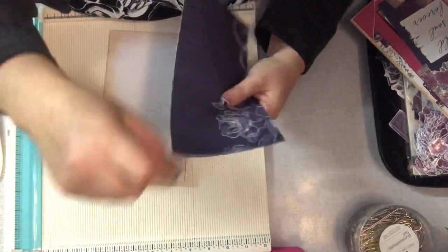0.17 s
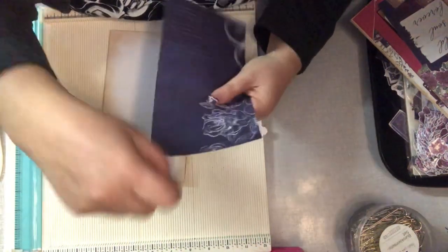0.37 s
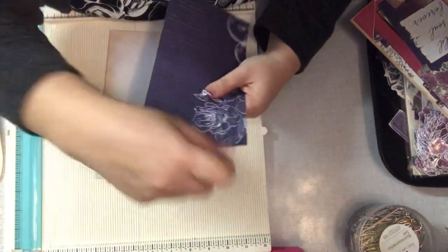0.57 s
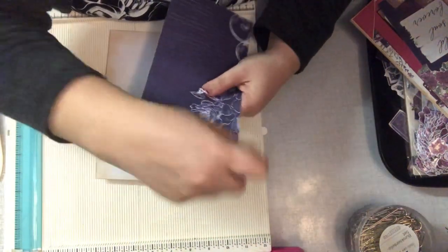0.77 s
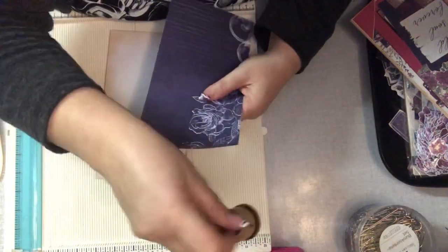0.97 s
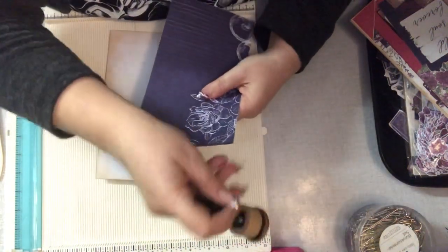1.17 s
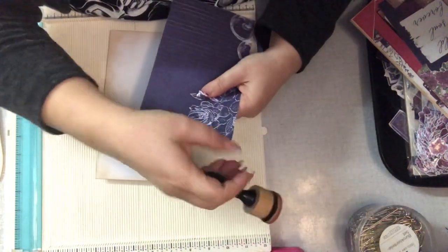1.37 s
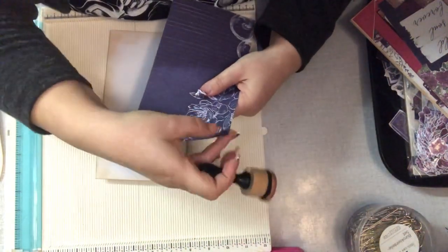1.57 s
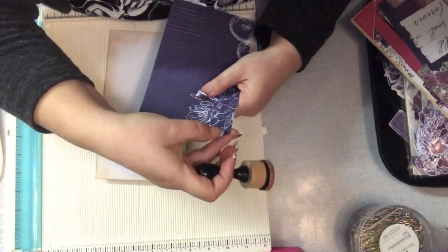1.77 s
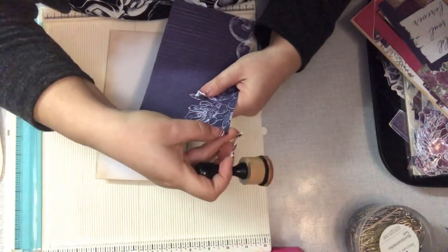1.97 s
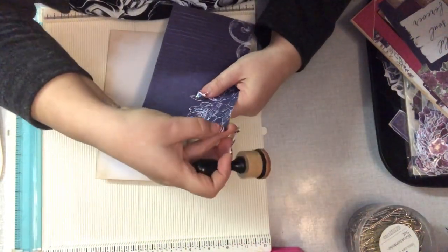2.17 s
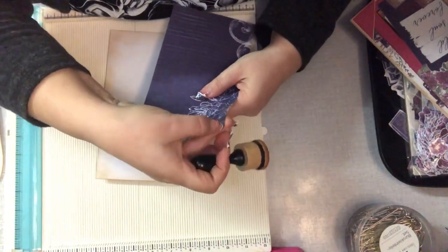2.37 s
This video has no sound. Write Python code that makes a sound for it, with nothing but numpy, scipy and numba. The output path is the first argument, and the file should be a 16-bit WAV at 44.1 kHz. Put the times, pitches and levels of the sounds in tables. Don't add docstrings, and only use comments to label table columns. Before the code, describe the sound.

Close-miked card craft: short hissing foam swipes with papery wobbles, one bright snap and a dull knock, then a lull with small clicks, and quiet rubbing and creasing of card over low motor hum.

```python
import sys
import numpy as np
from scipy import signal
from scipy.fft import rfft, irfft
from scipy.io import wavfile
from scipy.ndimage import uniform_filter1d
from numba import njit

SR = 44100
rng = np.random.default_rng(int(sys.argv[2]) if len(sys.argv) > 2 else 0)


def file_out(sig):
    cols = np.atleast_2d(sig).T
    lim = np.clip(cols, -1, 1)
    pcm = np.round(lim * 32767).astype(np.int16)
    wavfile.write(sys.argv[1], SR, pcm)


def gain_from_db(level_db):
    decades = np.asarray(level_db, float) / 20
    return 10 ** decades


N = 110250
T = np.arange(N) / SR
LONGEST_S = 0.4

# frequency_hz, density_db (per Hz)
FOAM_SPECTRUM = [(180, -32.5), (300, -4), (689, -10.5), (1210, 0), (1660, -13.5), (1870, -3.5),
                 (3190, -7.5), (6960, -18), (16000, -37.5)]


def unit(x):
    return x / np.sqrt(np.mean(x ** 2))


@njit
def svf(x, hz, k):
    y, b, l = np.empty(len(x)), 0., 0.
    for i in range(len(x)):
        g = np.tan(np.pi * hz[i] / SR)
        v = (b + g * (x[i] - l)) / (1 + g * (g + k))
        b, l, y[i] = 2 * v - b, l + 2 * g * v, k * v
    return y


def band(x, hz, width_hz):
    return svf(x, np.full(len(x), 1. * min(hz, .45 * SR)), width_hz / hz)


def body(x, peaks):
    total = 0
    for k, (hz, width_hz, db) in enumerate(peaks):
        total = total + (-1) ** k * gain_from_db(db) * band(x, hz, width_hz) / np.sqrt(width_hz)
    return unit(total)


def colour(x, points, tilt_db=0):
    octave = np.log2(np.maximum(np.fft.rfftfreq(len(x), 1 / SR), 1))
    hz, db = np.array(points).T
    knots = np.log2(hz)
    gain = gain_from_db(np.interp(octave, knots, db) + tilt_db * (octave - 11)) * (octave > knots[0])
    return unit(irfft(rfft(x) * gain, len(x)))


def grit(per_s, spread_db):
    chance, side, size = rng.random((3, N))
    return (chance < per_s / SR) * np.sign(side - .5) * gain_from_db(-spread_db * np.log(np.maximum(size, .02)))


def walk(rate_hz):
    k = int(SR / rate_hz)
    w = uniform_filter1d(np.repeat(rng.standard_normal(N // k + 1), k), k)[:N]
    return w / w.std()


def fade(t0, t60, rise_s, t=T):
    t = np.maximum(t - t0, 0)
    return (1 - np.exp(-t / rise_s)) * gain_from_db(-60 * t / t60)


def ring(modes, rise_s):
    t = T[:int(LONGEST_S * SR)]
    total = sum(gain_from_db(db - 60 * t / t60) * np.sin(2 * np.pi * hz * t) for hz, db, t60 in modes)
    return total * (1 - np.exp(-t / rise_s)) ** 2


def add(out, t0, sound):
    i = int(t0 * SR)
    out[i:i + len(sound)] += sound[:N - i]


def wavering_tone(hz, db):
    return np.sqrt(2) * gain_from_db(db) * np.sin(2 * np.pi * np.cumsum(hz) / SR)


def room_tone():
    # time_s, tone_hz, tone_db, rumble_db
    hum = np.array([(0.0, 117.4, -63.5, -53.5), (0.59, 123.6, -66.5, -55), (0.66, 116.7, -69, -51.5),
                    (0.83, 114.4, -78, -52), (0.88, 124.4, -71, -50), (1.09, 119.7, -65, -58.5),
                    (1.54, 117.7, -56, -55), (1.69, 116.3, -56.5, -53.5), (1.8, 118.8, -67, -56),
                    (2.16, 106.7, -62.5, -55), (2.23, 107.9, -80, -63), (2.46, 104.3, -58, -52.5),
                    (2.5, 105.4, -65, -59)])
    # frequency_hz, density_db (per Hz)
    air_spectrum = [(82, -34.5), (140, -8), (217, -15.5), (469, -17), (498, -23.5), (1220, -26),
                    (1420, -26.5), (5590, -36), (13000, -43), (16000, -56.5)]
    waver_db = 0.5
    tone_hz, tone_db, rumble_db = (np.interp(T, hum[:, 0], column) for column in hum.T[1:])
    tone = wavering_tone(tone_hz * (1 + .02 * walk(6.7)), tone_db + waver_db * walk(25))
    rumble = wavering_tone(49.5 + 2 * walk(12), rumble_db + waver_db * walk(11))
    rumble += wavering_tone(59.7 + 2 * walk(6.1), rumble_db - 6 + waver_db * walk(10))
    w = rng.standard_normal((3, N))
    under = gain_from_db(-66) * unit(band(band(w[1], 78, 53), 78, 53)) + gain_from_db(-65.5) * unit(band(w[0], 30, 60))
    air = colour(w[2], air_spectrum)
    air += gain_from_db(-18) * unit(band(w[1], 5700, 400)) + gain_from_db(-13.5) * unit(band(w[0], 450, 90))
    return tone + rumble + under + gain_from_db(-66.5 + 0.61 * walk(2.8)) * air


def fingers():
    # start_s, length_s, body_db, skin_db
    rub_events = [(0.167, .02, -72.5, -68), (0.559, 0.0286, -72.5, -72), (0.764, 0.046, -68, -80.5),
                  (1.361, 0.059, -75, -79.5), (1.534, 0.039, -64.5, -75), (1.592, 0.053, -64, -71.5),
                  (1.661, 0.044, -64.5, -67), (1.714, 0.021, -55.5, -69), (1.754, 0.014, -64, -67),
                  (1.772, .04, -55.5, -63.5), (1.818, 0.039, -64, -64.5), (1.858, 0.0295, -59, -65.5),
                  (1.909, 0.0084, -61.5, -74.5), (1.956, 0.12, -65, -66.5), (2.055, 0.012, -55.5, -62.5),
                  (2.075, 0.011, -60, -75.5), (2.117, 0.013, -60.5, -70), (2.133, 0.019, -54, -63),
                  (2.155, 0.059, -56, -62.5), (2.213, 0.058, -62.5, -66.5), (2.28, 0.015, -59.5, -73),
                  (2.301, 0.06, -65, -73.5), (2.353, 0.037, -62.5, -60.5), (2.388, 0.053, -63.5, -68.5),
                  (2.44, 0.056, -68, -76)]
    # frequency_hz, width_hz, level_db
    card_modes = [(457, 146, -2), (780, 54, -6.5), (1120, 140, 2), (1297.6, 180, 0), (1520, 250, 0.5),
                  (2200, 415, -14.5)]
    skin_modes = [(2360, 210, -1), (3540, 490, 0.5), (5120, 1800, -3), (7360, 3500, -11),
                  (11275, 3000, -17)]
    rise_s, stop_s = 0.003, 0.0031
    low, high = body(grit(5000, 1.5), card_modes), body(grit(5000, 3.2), skin_modes)
    out = np.zeros(N)
    for t0, dur, low_db, high_db in rub_events:
        s = slice(int(t0 * SR), int((t0 + LONGEST_S / 2) * SR))
        t = T[s] - t0
        rub = np.clip(t / rise_s, 0, 1) * np.exp(-np.maximum(t - dur, 0) / stop_s)
        out[s] += rub * (gain_from_db(low_db) * low[s] + gain_from_db(high_db) * high[s])
    return out * gain_from_db(1.3 * walk(110))


def creases():
    # time_s, peak_db, pitch_hz, t60_s
    low_folds = [(0.032, -40, 1053, 0.024), (0.041, -43.5, 1073, 0.027), (0.384, -39, 1094, 0.024),
                 (0.411, -44, 1076, 0.026), (0.424, -37.5, 1040, 0.027), (0.431, -40, 840, 0.02),
                 (1.666, -48.5, 1100, 0.024), (1.714, -46.5, 1240, 0.022), (1.721, -48, 1020, 0.029),
                 (1.731, -54, 1590, 0.024), (1.773, -40, 1290, 0.02), (1.78, -46.5, 1050, 0.024),
                 (1.792, -48, 1240, 0.024), (1.798, -48.5, 1050, 0.024), (1.81, -47.5, 1580, 0.021),
                 (1.841, -49.5, 1030, 0.024), (1.86, -44.5, 1085, 0.019), (1.867, -45.5, 1070, 0.026),
                 (1.915, -46, 1096, 0.03), (2.059, -43, 1350, 0.024), (2.064, -49, 1100, 0.024),
                 (2.076, -54, 1370, 0.024), (2.119, -41.5, 1250, 0.024), (2.126, -41, 1230, 0.023),
                 (2.161, -49, 1060, 0.024), (2.185, -47, 1180, 0.026), (2.285, -51, 1013, 0.024),
                 (2.36, -51, 1210, 0.024), (2.376, -47.5, 1195, 0.028)]
    crackles = [(0.0114, -34, 2330, 0.014), (0.0248, -34, 3200, 0.013), (0.0328, -32, 3270, 0.011),
                (0.382, -40, 1950, 0.013), (0.4026, -35, 1900, 0.018), (0.4184, -36.5, 3100, 0.015),
                (0.4254, -32, 2150, 0.016), (0.6234, -35, 1840, 0.014), (1.8384, -51, 3550, 0.013),
                (2.2075, -42.5, 3680, 0.013), (2.2847, -48, 2410, 0.014), (2.3018, -50, 2650, 0.012),
                (2.3536, -49, 3530, 0.011), (2.3754, -49.5, 2720, 0.012)]
    buckles = [(0.428, -42.5, 301, 0.03), (0.44, -43.5, 315.7, 0.028), (0.45, -46, 496, 0.038),
               (0.644, -40.5, 326, 0.024), (0.651, -44.5, 483, 0.032), (0.672, -43.5, 493, 0.039),
               (2.06, -46.5, 541, 0.027)]
    # time_s, level_db
    lone_clicks = [
        (1.3, -35.5),
        (1.1484, -40),
        (1.2197, -47),
    ]
    out = np.zeros(N)
    click = ring([(6500, 0, 0.0012)], 1 / SR)
    for t0, db, hz, t60 in [*low_folds, *crackles, *buckles]:
        pop = ring([(hz, 0, t60), (hz * 1.17, -5, t60)], 0.0009)
        add(out, t0, gain_from_db(db + 3) * (pop + gain_from_db(-9) * click))
    for t0, db in lone_clicks:
        add(out, t0, gain_from_db(db) * click)
    return out


def knocks():
    knock_s = [.8382, .5955, .855]
    knock_db = [-30.5, -47, -41]
    thump_db = [-35.5, -35, -71]
    # frequency_hz, level_db, t60_s
    table_modes = [(335.4, 0.5, 0.041), (530.5, 6.5, 0.028), (764, -6.5, 0.058), (1028, -2.5, 0.043),
                   (1470, 8, 0.021), (1560, -25, 0.03)]
    out = np.zeros(N)
    for t0, table_level, thump_level in zip(knock_s, knock_db, thump_db):
        thump = ring([(247, thump_level, 0.027)], 0.0011)
        add(out, t0, gain_from_db(table_level) * ring(table_modes, 0.00096) + thump)
    return out


def ticks():
    # time_s, peak_db, pitch_hz, t60_s
    tick_events = [(0.0327, -27.5, 4530, 0.0085), (0.426, -39, 5600, 0.03), (1.148, -50, 9500, .02),
                   (2.1187, -46.5, 6000, .03), (2.165, -59, 11000, 0.083), (.596, -42.5, 3023, 0.026),
                   (1.148, -47, 3580, 0.052), (1.1672, -48, 4500, 0.03), (1.2017, -49, 4110, 0.0715),
                   (1.217, -42.5, 3617, 0.029), (1.665, -50, 4480, 0.027), (1.772, -44.5, 7000, 0.02),
                   (1.838, -53, 7200, 0.055), (2.059, -51, 4500, .03), (2.207, -40, 3340, 0.02),
                   (2.286, -47.5, 2880, 0.041), (2.302, -49, 3200, 0.018), (.798, -42, 2000, 0.014),
                   (0.3826, -40, 3600, .03), (1.2187, -40, 5600, 0.047)]
    out = np.zeros(N)
    n = int(LONGEST_S * SR / 2)
    g = grit(9000, 3.5)
    air = gain_from_db(-10.5) * colour(g, FOAM_SPECTRUM, 3.0)
    for t0, db, hz, t60 in tick_events:
        i = int(t0 * SR)
        tick = unit(band(g[i:i + n], hz, hz * 0.17)) + air[i:i + n]
        add(out, t0, gain_from_db(db - 9.5) * tick * fade(0, t60, 0.00026, T[:n])[:N - i])
    return out


def rim_snap(snap_s):
    # frequency_hz, density_db (per Hz)
    rattle_spectrum = [(180, -47), (300, -10.5), (978, -8), (2000, -12), (2250, 0.5), (3580, -6),
                       (4090, -2.5), (10900, -30), (16000, -62)]
    # frequency_hz, level_db, t60_s
    rim_modes = [(477, -16, 0.077), (1034, -9.5, 0.066), (1785, -14, 0.1), (2330, -1, 0.033),
                 (2590, -9, 0.04), (2829, -5, .025), (2894, -1.5, 0.025), (3560, -7.5, 0.02),
                 (3730, -5.5, 0.026), (4086, -5.5, .022), (4210, -3.5, 0.018), (4813, -2, 0.028)]
    crack_modes = [(2544, 2.5, 0.0043), (4414, 6, 0.0029), (7600, -12, 0.0034)]
    out = gain_from_db(-13.5) * colour(rng.standard_normal(N), rattle_spectrum) * fade(snap_s, 0.042, 0.0013)
    add(out, snap_s, gain_from_db(-16) * ring(rim_modes, 0.0003) + ring(crack_modes, 0.00031))
    return out


def swipes():
    # start_s, length_s, hiss_db, brightness_db (per octave), wobble_db
    swipe_events = [
        (.003, 0.036, -45, 2.5, -48),
        (0.184, 0.043, -45.5, 3.5, -33.5),
        (0.372, 0.055, -46, 1, -41.5),
        (0.599, 0.035, -42.5, -1.16, -39),
        (0.802, 0.04, -45, 0, -34.5),
        (0.844, 0.019, -50.5, 1.7, -56.5),
        (0.892, 0.04, -57.5, -2, -54.5),
    ]
    # frequency_hz, width_hz, level_db
    edge_modes = [(1200, 52, -11), (2016, 45, 2.5), (2260, 27, -9), (2580, 40, -4), (3200, 49, -3)]
    rise_s, stop_s = 0.0083, 0.0041
    wobble_from_hz, wobble_to_hz, sag_s, wobble_width = 1100, 328, 0.011, 1.2
    flap_hz, flap_width_hz = 262, 200
    g, shake, out = grit(8000, 3.5), rng.standard_normal(N), np.zeros(N)
    edge = gain_from_db(-10.5) * body(g, edge_modes)
    stutter_db = 1.6 * walk(150)
    flap = band(rng.standard_normal(N), flap_hz, flap_width_hz)
    flap = unit(band(flap, flap_hz, flap_width_hz))
    for t0, dur, db, tilt_db, wobble_db in swipe_events:
        s = slice(int(t0 * SR), int((t0 + LONGEST_S) * SR))
        t, end = T[s], t0 + dur
        since_end = np.maximum(t - end, 0)
        drag = np.clip((t - t0) / rise_s, 0, 1) * np.exp(-since_end / stop_s)
        hiss_db = db - 2 + 1.8 * (np.clip((t - t0) / dur, 0, 1) - 1.5) + stutter_db[s]
        out[s] += gain_from_db(hiss_db) * drag * (colour(g[s], FOAM_SPECTRUM, tilt_db) + edge[s])
        out[s] += gain_from_db(db - 3.5) * flap[s] * fade(end - .006, 0.13, 0.0079, t)
        hz = wobble_to_hz + wobble_from_hz * np.exp(-since_end / sag_s)
        wobble = svf(svf(shake[s], hz, wobble_width), hz, wobble_width)
        wobble *= np.sqrt(SR / 2 / hz / wobble_width)
        out[s] += gain_from_db(wobble_db) * wobble * fade(end - .003, 0.14, 0.0043, t)
    return out


def walls(t0):
    t60_s, rise_s = 0.34, 0.0073
    return fade(t0 + 0.021, t60_s, rise_s) + gain_from_db(-1.5) * fade(t0 + 0.032, t60_s, rise_s / 2)


def echo(x, response, db):
    return gain_from_db(db) * signal.fftconvolve(x, response[:SR // 2] / np.sqrt(np.sum(response ** 2)))[:N]


def scene():
    # frequency_hz, density_db (per Hz)
    tail_spectrum = [(410, -49), (700, -18.5), (1350, -14), (1550, -18), (2280, -6), (3660, -1), (5590, -9),
                     (15000, -50)]
    snap_s = 0.2237
    near = swipes() + knocks() + ticks() + fingers() + creases()
    snap = rim_snap(snap_s)
    w = rng.standard_normal((2, N))
    wall_band = signal.butter(1, [2100, 9100], "band", fs=SR, output="sos")
    late = signal.sosfilt(wall_band, w[0]) * walls(0)
    early = w[1] * fade(.002, 0.08, 0.002013)
    tail = gain_from_db(-43) * colour(w[0], tail_spectrum) * walls(snap_s)
    room = echo(near + snap, early, -17) + echo(near, late, -24) + tail
    return (near + snap + room + room_tone())[None]


def band_limit(x):
    return signal.sosfilt(signal.butter(12, 16160, fs=SR, output="sos"), x)


def record(dry):
    low_pass = signal.ellip(6, .2, 50, 15500, fs=SR, output="sos")
    return band_limit(signal.sosfilt(low_pass, dry))


dry = scene()
out = record(dry)
file_out(out)
```